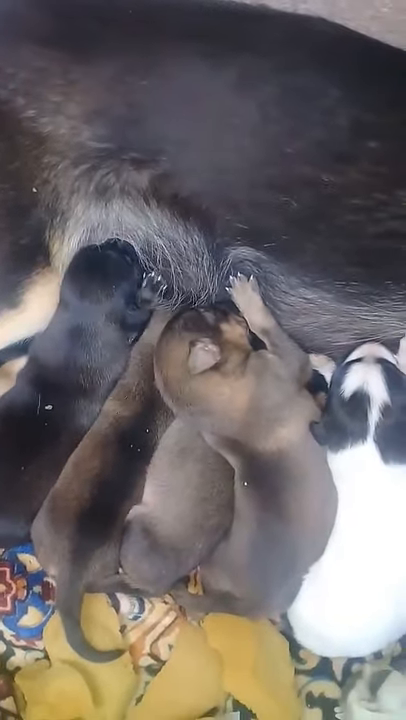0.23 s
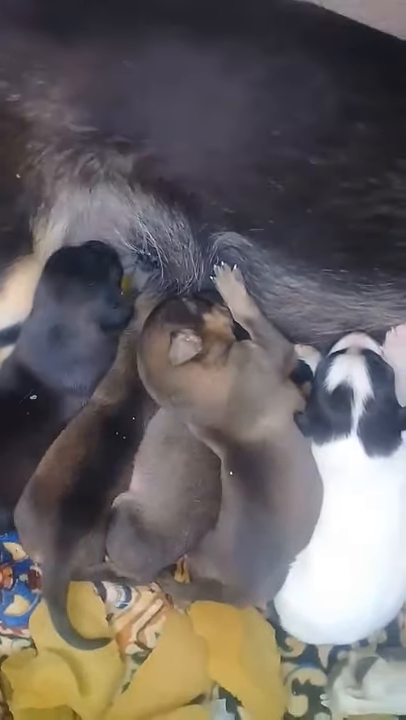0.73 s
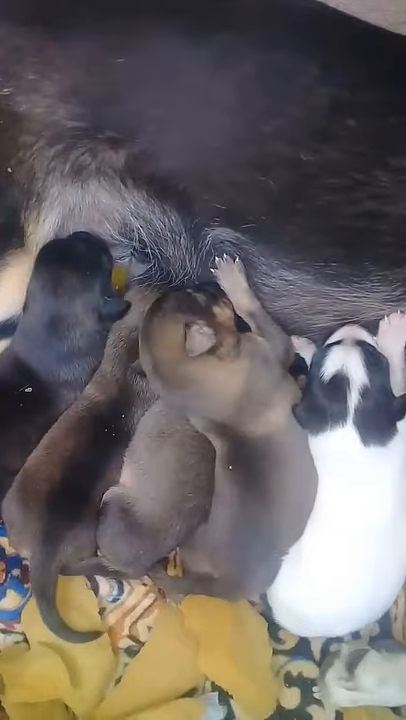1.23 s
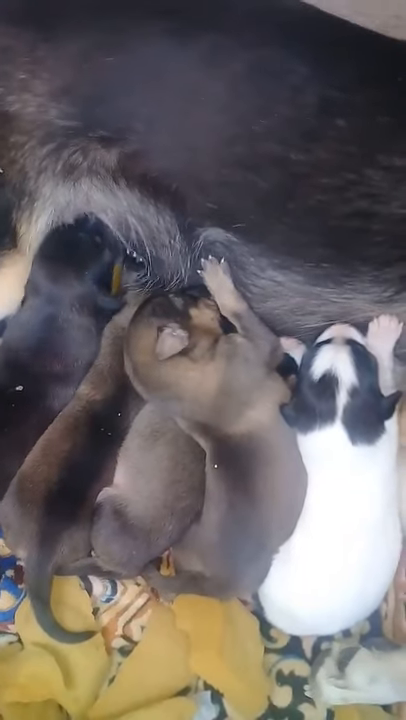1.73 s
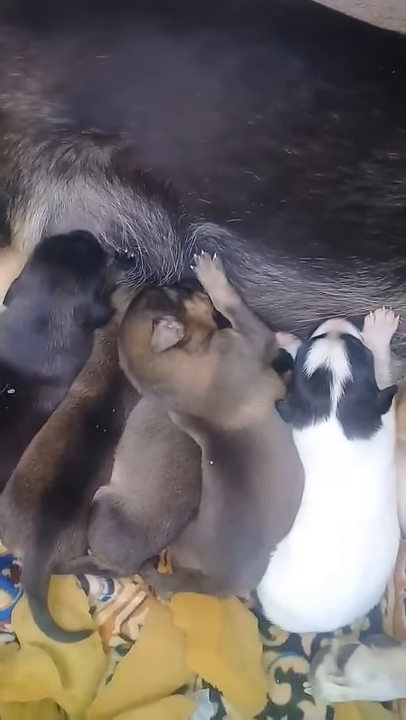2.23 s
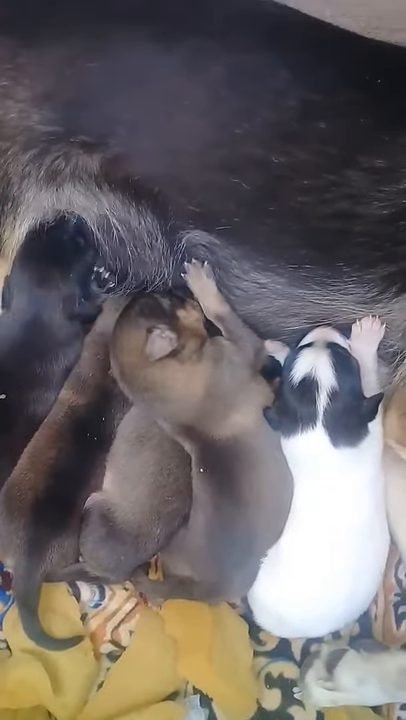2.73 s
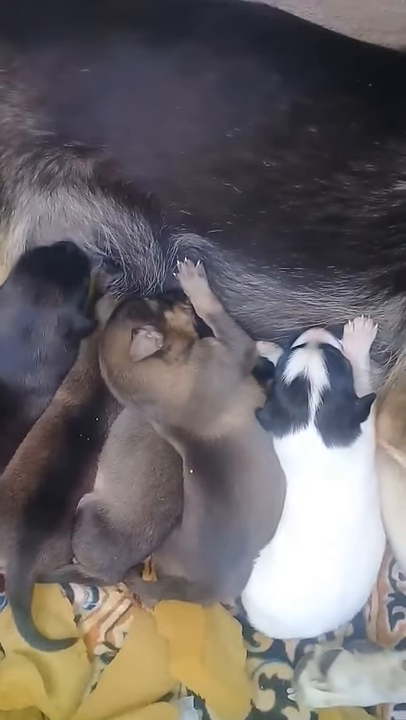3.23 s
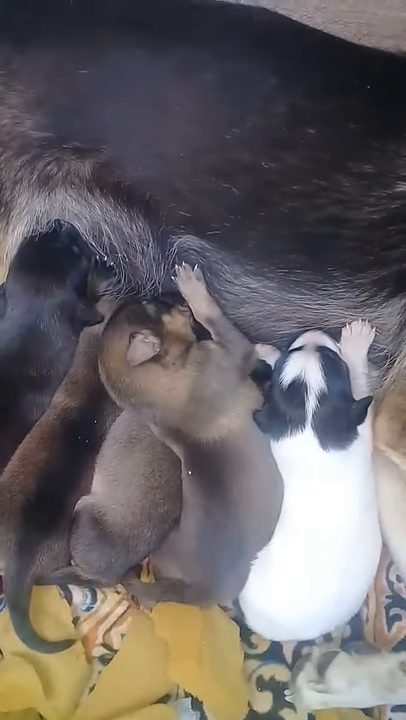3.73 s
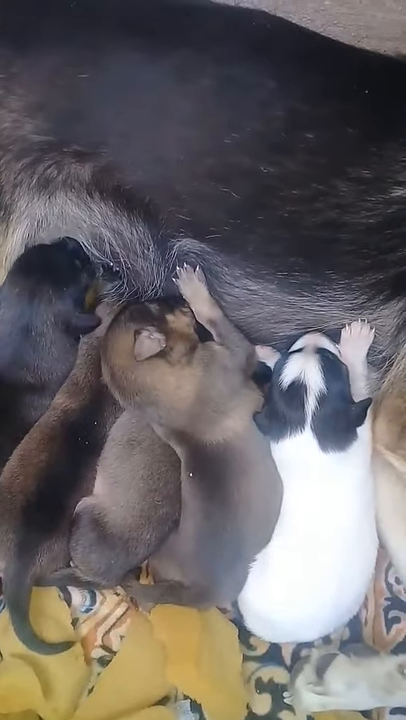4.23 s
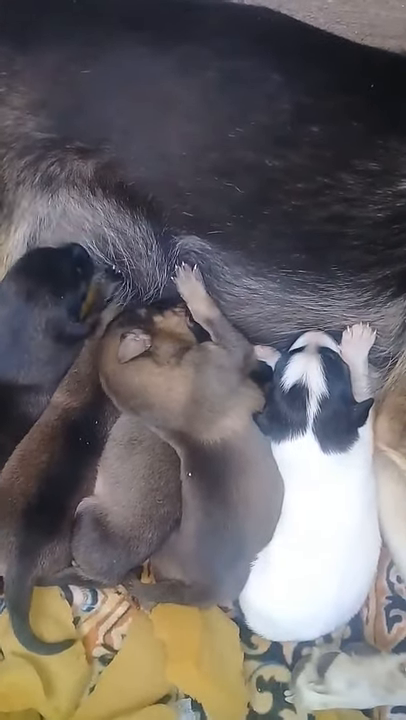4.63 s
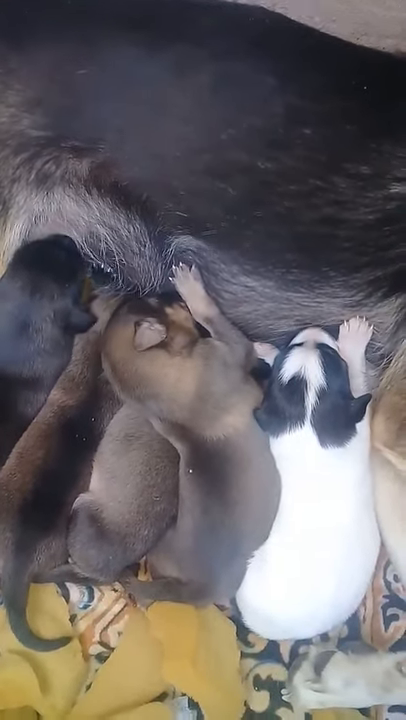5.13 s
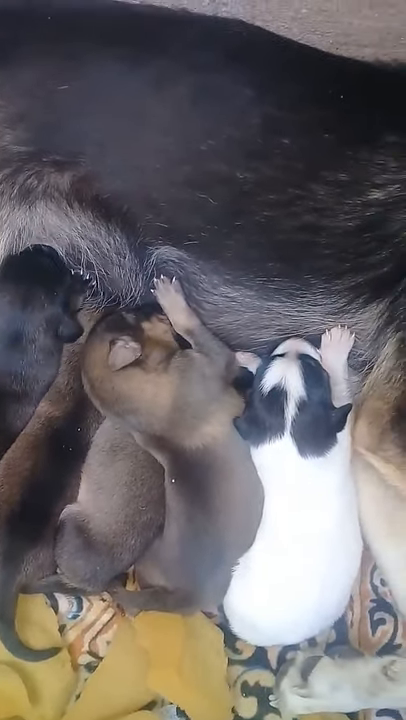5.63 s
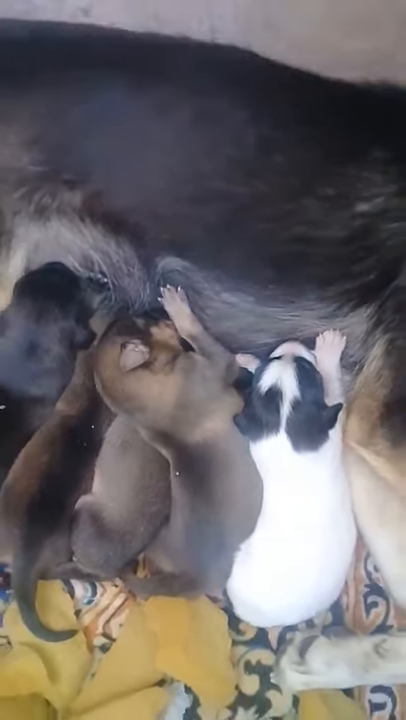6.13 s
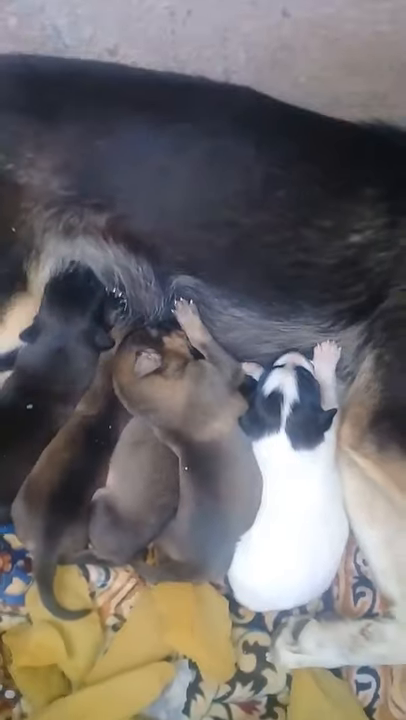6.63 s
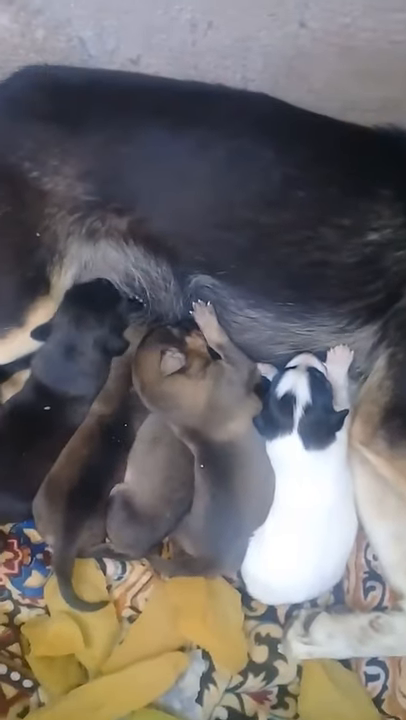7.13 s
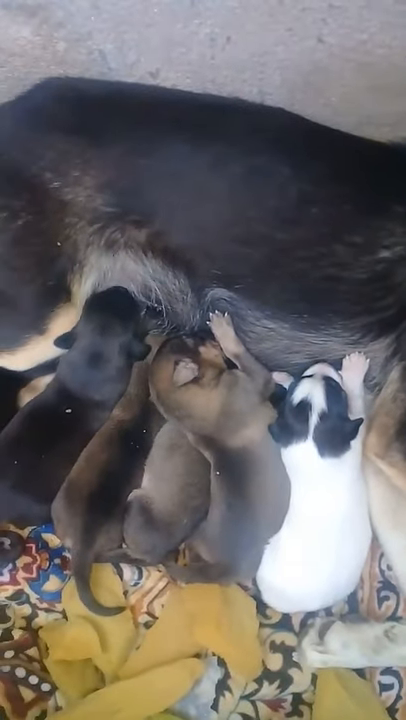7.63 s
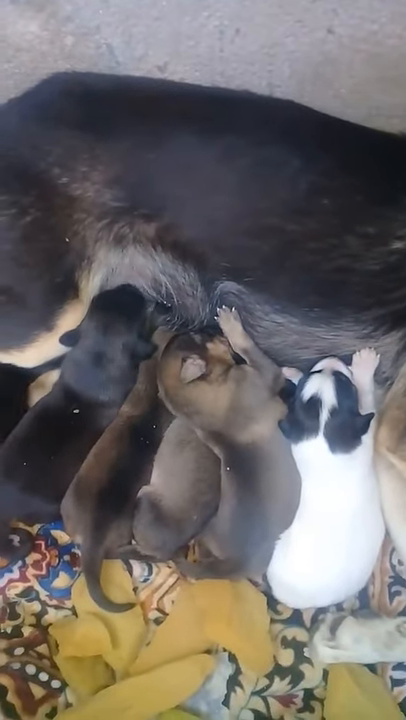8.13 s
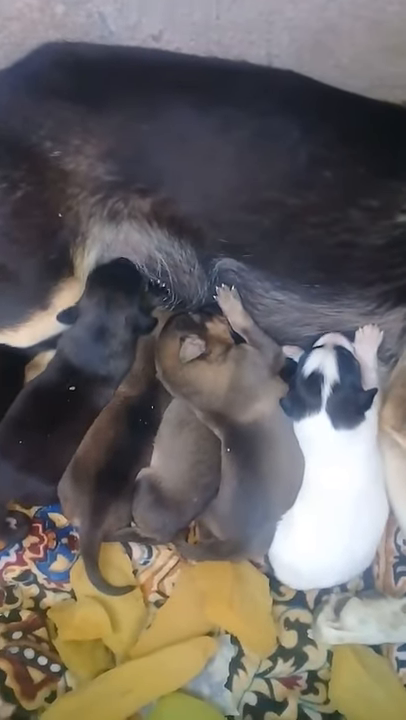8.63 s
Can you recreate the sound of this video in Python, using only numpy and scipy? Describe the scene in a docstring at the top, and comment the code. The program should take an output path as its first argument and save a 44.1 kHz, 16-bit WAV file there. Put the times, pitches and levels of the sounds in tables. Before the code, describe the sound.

Close microphone in a quiet room: tiny puppies whine almost without pause, clear and nasal, their pitch gliding and wobbling, voices sometimes breaking rough. Between and after the whines come hoarse short grunts, little wheezes and a lip smack. Far engines hum low and traffic murmurs faintly underneath, with slight steady hiss. A dull quiet thump sounds near the close, while a last whimper fades into a grunt.

```python
"""Newborn puppies nurse on a blanket in a room. From the start far engines hum, as sines on their low orders,
and traffic rumble and the room's hiss, both coloured noise, lie under it all. At once a puppy whimpers:
gliding stacks of partials that now and then break. Snuffles, wheezes and faint whimper-like tones follow, as
noise in narrow resonances; another puppy grunts hoarsely, as uneven pulses ringing a throat; later lips smack,
as clicks into a small mouth. Near the end comes a low thump, made of sines like the hums.
A few short wall echoes follow the litter."""
import sys
import numpy as np
from scipy import signal
from scipy.fft import rfft, irfft, next_fast_len
from scipy.io import wavfile
from scipy.ndimage import uniform_filter1d

SR = 44100
rng = np.random.default_rng(int(sys.argv[2]) if len(sys.argv) > 2 else 0)


def ratio_of_db(decibels):
    """Turn decibels (scalar or array-like) into linear amplitude factors; 0 dB maps to 1."""
    return 10 ** (np.asarray(decibels, float) / 20)


def bounce(signal):
    """Save signal as a 16-bit WAV file at the path given by the first command-line argument."""
    frames = np.transpose(np.atleast_2d(signal))
    limited = np.clip(frames, -1, 1)
    pcm = np.round(limited * 32767).astype(np.int16)
    wavfile.write(sys.argv[1], SR, pcm)


N = 391597   # length in samples
TIME = np.arange(N) / SR   # seconds


def rms_one(x):
    """Scale to rms 1."""
    return x / np.sqrt(np.mean(x ** 2) + 1e-20)


def in_time(rows):
    """The sample span of a table and its columns over that span."""
    s, *columns = np.transpose(rows)
    span = slice(int(s[0] * SR), min(int(s[-1] * SR), N))
    return span, [np.interp(TIME[span], s, column) for column in columns]


def at_hz(points, hz):
    """Read a spectrum on a log-frequency axis."""
    point_hz, db = np.transpose(points)
    return np.interp(np.log(hz), np.log(point_hz), db)


def coloured(spectrum):
    """Steady noise of a given spectrum, silent outside it; rms 1."""
    size = next_fast_len(N)
    hz = np.arange(1, size // 2 + 2) * SR / size
    inside = (hz > spectrum[0][0]) & (hz < spectrum[-1][0])
    white = rfft(rng.standard_normal(size))
    return rms_one(irfft(white * ratio_of_db(at_hz(spectrum, hz)) * inside, size)[:N])


def drift(hz):
    """Random wandering, mostly slower than hz; rms 1."""
    lowpass = signal.butter(2, hz, fs=SR, output="sos")
    return rms_one(signal.sosfilt(lowpass, rng.standard_normal(N + SR))[SR:])


def resonance(x, hz, width_hz):
    """Two-pole band, gain 1 on top."""
    r = np.exp(-np.pi * width_hz / SR)
    zeros = np.array([1, 0, -1]) * (1 - r * r) / 2
    poles = [1, -2 * r * np.cos(2 * np.pi * hz / SR), r * r]
    return signal.lfilter(zeros, poles, x + 1e-18)


def window(start, end, edge):
    """Up to 1 between start and end, with ramps of edge seconds."""
    return np.clip(np.minimum(TIME - start, end - TIME) / edge, 0, 1)


def glide(s, hz, time):
    """A smooth curve through pitch points, flat at every turn."""
    steps = np.diff(hz) / np.diff(s)
    same = steps[1:] * steps[:-1]   # positive where the pitch keeps its direction
    inner = np.where(same > 0, 2 * same / (steps[1:] + steps[:-1] + 1e-9), 0)
    slope = np.r_[steps[0], inner, steps[-1]]
    k = np.clip(np.searchsorted(s, time) - 1, 0, len(s) - 2)
    width = s[k + 1] - s[k]
    u = (time - s[k]) / width
    ease = u * u * (3 - 2 * u)
    bend = width * u * (1 - u) * ((1 - u) * slope[k] - u * slope[k + 1])
    return hz[k] + ease * (hz[k + 1] - hz[k]) + bend


def edges_db(start, end, rise_s, fall_s, depth_db):
    """0 dB in the middle, sloping to depth_db at both ends."""
    return depth_db * (np.clip(1 - (TIME - start) / rise_s, 0, 1) + np.clip(1 - (end - TIME) / fall_s, 0, 1))


# Far hums, one table each; the last is a low thump. Each row: time in seconds, pitch in Hz, level in dB.
HUMS = [
    [(0, 52.8, -60.5), (.5, 54.3, -60), (2.0, 54.4, -62.5), (2.9, 53.9, -62), (3.4, 50.2, -59),
     (3.98, 48.5, -60), (4.4, 43.2, -74)],
    [(4.41, 40.6, -67), (4.65, 37.08, -61), (5.2, 33.32, -55.5), (6.09, 36.74, -57), (6.7, 36.8, -57.5),
     (7.41, 36.7, -57.5), (7.8, 42.84, -76.5), (8.88, 41.2, -87)],
    [(7.85, 44.56, -90), (8.12, 43.71, -47.5), (8.6, 44.2, -70.5)],
]
# Their orders. Each row, one a hum or thump: first, second and third order in dB against its level.
HUM_ORDERS = [(0, -4.5, -30.5), (-12, -0.5, -13.5), (2, -21, -40)]


def hums_and_thump(waver):
    """The low orders of far engines and of a low thump, wavering on their way through the walls."""
    out, slow = np.zeros(N), drift(2.27)
    for rows, orders_db in zip(HUMS, HUM_ORDERS):
        span, (hz, level_db) = in_time(rows)
        phase = 2 * np.pi * np.cumsum(hz) / SR
        for k, db in enumerate(orders_db):
            wavering = 1 + waver * np.roll(slow, k * SR)[span]
            out[span] += np.sqrt(2) * ratio_of_db(level_db + db) * wavering * np.sin((k + 1) * phase)
    return out


# Course of the traffic rumble. Each row: time in seconds, level in dB.
RUMBLE_LEVEL = [(0, -60), (.7, -61.5), (2, -61.5), (3.4, -63.5), (4.4, -61), (4.9, -61), (5.3, -60.5),
                (7.3, -59.5), (8.1, -61), (8.88, -61.5)]
# Colour of the rumble. Each row: frequency in Hz, density in dB per Hz.
RUMBLE_COLOUR = [(20, -14), (37, -12), (60, 0), (100, -7.5), (150, -21.5), (300, -27.5)]


def traffic_rumble():
    """Low coloured noise whose level follows its course and sways at random."""
    level_db = np.interp(TIME, *np.transpose(RUMBLE_LEVEL))
    sway_db = 2.73 * drift(3.0)
    return ratio_of_db(level_db + sway_db) * coloured(RUMBLE_COLOUR)


# Colour of the room and microphone hiss. Each row: frequency in Hz, density in dB per Hz.
HISS_COLOUR = [(76, -32.5), (130, 2.5), (210, -20.5), (278, -5.5), (645, -10.5), (1060, -13.5),
               (2140, -16.5), (4770, -25), (12000, -25), (15600, -23)]


def room_hiss():
    """Steady coloured noise of room and microphone."""
    return ratio_of_db(-73) * coloured(HISS_COLOUR)


# Whimpers, one table each. Each row: time in seconds, pitch in Hz, effort in dB,
# second partial in dB against the effort.
WHIMPERS = [
    [(0.012, 1418, -43.5, -6), (0.08, 1355, -41, -5.5), (0.09, 1230, -41, -15.5), (0.142, 1124, -41, -4),
     (0.184, 1116, -41.5, -4.5), (0.282, 985, -40.5, -10.5), (0.47, 893.7, -40.5, -12),
     (0.534, 888, -38.5, -13), (0.56, 806, -40.5, -6.5), (0.598, 790, -43, -4), (0.65, 1015, -41.5, -13),
     (0.682, 966, -41, -21), (0.712, 1073, -44, -14.5), (0.728, 951, -36, 1)],
    [(1.25, 856, -42, -8), (1.266, 851, -46, -3), (1.346, 690, -37.5, -10.5), (1.39, 651, -35.5, -9),
     (1.4, 720, -28.5, -8), (1.41, 780, -40, -4)],
    [(1.68, 733, -50, -8), (1.688, 803, -42, -8), (1.694, 811, -44.5, -6), (1.722, 657, -40.5, -21),
     (1.756, 619, -44.5, -8.5), (1.83, 632, -30.5, -5)],
    [(2.0, 785, -56, -8), (2.082, 767, -54.5, -7)],
    [(2.09, 1212, -52, -2), (2.122, 1200, -48, -1.5), (2.134, 955, -44, -19), (2.2, 910, -39.5, -21),
     (2.25, 820, -42, -3.5), (2.32, 803, -39.5, -4), (2.395, 910, -36, -7)],
    [(2.48, 541, -50, -8), (2.552, 512, -54, -26)],
    [(2.686, 1210, -41, -14), (2.698, 1065, -41.5, -5.5), (2.75, 1090, -36.5, -8.5),
     (2.842, 1018, -41.5, -9), (2.866, 995, -38.5, -13.5), (2.918, 996, -40.5, -13),
     (2.932, 1083, -44, -20), (2.95, 1084, -39, -13)],
    [(3.24, 1797, -32.5, -20), (3.3, 1405, -36.5, -13), (3.342, 1365, -41, -4.5),
     (3.402, 1177, -39.5, -21.5), (3.442, 1165, -42, -16.5), (3.494, 1244, -40.5, -23.5),
     (3.556, 1249, -41, -12.5), (3.658, 1103, -37.5, -8), (3.682, 1091, -37, -3),
     (3.724, 1221, -41.5, -16.5), (3.738, 1225, -40.5, -5), (3.774, 1091, -36.5, -8),
     (3.796, 1086, -36.5, -5), (3.868, 1199, -39, -10.5), (3.89, 1273, -42, -8), (3.935, 1190, -37, -17)],
    [(4.186, 1522, -39.5, -12), (4.23, 1637, -34.5, -13), (4.256, 1629, -34.5, -7.5),
     (4.278, 1482, -36, -16), (4.326, 1587, -45.5, -16), (4.338, 1469, -45, -10), (4.345, 1498, -38, -9)],
    [(4.47, 930, -74, -30), (4.526, 897, -65, -30), (4.558, 850, -65, -35), (4.62, 874, -63, -33)],
    [(4.63, 1242, -39, -6), (4.69, 1252, -42.5, -6.5), (4.704, 1310, -36, -9.5), (4.728, 1310, -39.5, -8),
     (4.81, 1123, -38.5, -8.5), (4.828, 1112, -38, -8), (4.844, 1220, -40, -15), (4.86, 1201, -37.5, -2.5),
     (4.89, 1115, -38.5, -12), (4.897, 1144, -27, -8)],
    [(5.113, 1318, -32, -8), (5.121, 1183, -46.5, -8), (5.139, 1102, -37, -8), (5.295, 1031, -40.5, -11.5),
     (5.345, 1023, -39.5, -11), (5.379, 979, -37, -5.5), (5.417, 982, -37.5, -16.5),
     (5.459, 909, -39, -7.5), (5.547, 968, -40, -13.5), (5.581, 1067, -43.5, -9), (5.593, 980, -23, 0)],
    [(6.22, 965, -64.5, -35), (6.345, 965, -76, -35)],
    [(6.355, 1233, -41, -9), (6.373, 1105, -42, -19), (6.455, 1028, -43.5, -6), (6.501, 923, -43, -3),
     (6.539, 935, -40.5, -4.5), (6.571, 989, -44, -1), (6.599, 985, -41, -4), (6.655, 877.5, -44, -8),
     (6.753, 914, -39, -6), (6.791, 887, -43.5, -3), (6.881, 874.5, -40, -6.5), (6.923, 965, -43, 1),
     (7.069, 959, -39, -2), (7.113, 993, -39.5, -3.5), (7.235, 857, -40.5, -5), (7.297, 844, -41, -5),
     (7.311, 920, -45, 2), (7.345, 917, -39.5, -5), (7.359, 1034, -35, -1.5), (7.365, 1010, -41, -10)],
    [(7.783, 1569, -38, -16), (7.805, 1442, -37.5, -18), (7.811, 1333, -36, -16), (7.847, 1033, -41.5, -5),
     (7.869, 991, -39, -4), (8.013, 1035, -44, -0.5), (8.047, 964, -40, 1), (8.095, 965, -42.5, 2),
     (8.165, 855, -41.5, -5), (8.233, 857, -43, -5.5), (8.327, 929, -41.5, -10.5), (8.357, 1083, -46, -10),
     (8.371, 990, -32, -10)],
]
# Colour of each whimper, in the same order. Each row: third partial and nasal treble, both in dB against effort.
WHIMPER_COLOURS = [(5.5, -23), (11.5, -23), (2, -20), (19, -28), (5, -21), (-17, -38), (10, -19.5),
                   (-2, -20.5), (-4, -28.5), (9.5, -36), (-4, -22), (5.5, -22.5), (-23, -35), (1, -19),
                   (2, -20.5)]
# Where the voice breaks. Each row: start and end in seconds, cycles in a strong-weak pattern,
# depth of the pattern (0-1), chaos (0-1).
BREAKS = [(0.559, 0.592, 2, 0.4, 0.3), (0.585, 0.668, 4, 0.45, 0.45), (0.66, 0.701, 2, 0.07, 0.15),
          (1.253, 1.337, 3, 0.42, 0.48), (1.326, 1.4, 2, 0, 0.24), (1.689, 1.732, 2, 0.3, 0.5),
          (1.736, 1.83, 2, 0.05, 0.12), (2.34, 2.392, 2, 0.31, 0.27), (3.239, 3.256, 2, 0.18, 0.51),
          (7.302, 7.334, 3, 0.49, 0.18), (8.212, 8.293, 2, 0.08, 0.11)]
# Brief dips of the first partial. Each row: middle in seconds, depth in dB.
CATCHES = [(0.088, -6), (3.371, -9.5), (4.691, -17), (4.741, -18), (7.806, -21)]
# Throat, nose and the echo off the blanket lift and cancel a partial as it glides, one table for each of
# the first three partials. Each row: frequency of the partial in Hz, gain in dB.
FIRST_GAIN = [(500, -7), (640, -8), (800, 1.5), (850, -1), (900, 4), (965, -2), (1010, 1.5), (1050, 2.5),
              (1090, 0), (1150, 0.5), (1225, 2.5), (1300, -4), (1350, 5.5), (1400, -1.5), (1485, 3.5),
              (1620, -5)]
SECOND_GAIN = [(1200, -0.5), (1350, 5.5), (1620, -3), (1750, -2.5), (1950, -4), (2050, -2), (2170, 2),
               (2260, -3.5), (2330, -7), (2450, 4.5), (2620, -4), (2800, -14), (3300, -9)]
THIRD_GAIN = [(1900, -36), (2450, -23), (2640, -25), (2900, -46), (3060, -42.5), (3200, -31), (3450, -37.5),
              (3700, -32.5), (4000, -40), (4900, -49)]
# Throat and nose above the third partial. Each row: frequency in Hz, gain in dB.
TRACT = [(2400, 13), (2900, 2), (3400, -0.5), (3900, -16), (4400, -23), (5800, -33), (6600, -12),
         (7500, -4), (9300, -11.5), (10500, -8.5), (12100, -15.5), (13800, -19.5), (15500, -34.5)]
# Breath noise in the nose. Each row: frequency in Hz, density in dB per Hz.
BREATH_COLOUR = [(300, -9), (1000, -1), (2500, -2.5), (5500, -20), (7500, 1), (9000, -1.5), (10200, 2),
                 (11000, -12), (11800, 7.5), (14000, -35), (15500, -3)]


def whimpers(jitter, shimmer, swell_db, overtone_db, breath_db):
    """A stack of partials on the vocal-fold pitch; breaks add lines at fractions of the pitch and chaos."""
    catch_s = 0.01                 # half the length of a dip
    rasp_s, rasp = 0.018, 0.35     # every whimper ends in a short rasp (chaos 0-1)
    halves = sum(window(a, b, 0.0037) * depth for a, b, cycles, depth, chaos in BREAKS)
    rough = sum(window(a, b, 0.00684) * chaos for a, b, cycles, depth, chaos in BREAKS)
    hz, fade = np.full(N, 1e3), np.zeros(N)
    first_db, second_db, third_db, treble_db = np.zeros((4, N))
    for rows, (third_colour_db, treble_colour_db) in zip(WHIMPERS, WHIMPER_COLOURS):
        span, (_, effort_db, rich_db) = in_time(rows)
        s, pitch_hz = np.transpose(rows)[:2]
        start, end = s[0], s[-1]
        hz[span] = uniform_filter1d(glide(s, pitch_hz, TIME[span]), 300, mode="nearest")
        # the voice sets in and dies away; its overtones come later and leave earlier
        first_db[span] = effort_db + edges_db(start, end, 0.011, 0.017, -15.5)[span]
        bloom_db = first_db[span] + edges_db(start, end, 0.087, 0.053, -9)[span]
        second_db[span] = bloom_db + rich_db
        third_db[span] = bloom_db + third_colour_db
        treble_db[span] = bloom_db + treble_colour_db
        fade[span] = np.minimum(window(start, 99, 0.002), window(-1, end, 0.008))[span]
        rough = rough + rasp * window(end - rasp_s, end, 0.00715)
    first_db += sum(db * window(s - catch_s, s + catch_s, catch_s) for s, db in CATCHES)

    wobble, flutter, tremor, swell = [drift(rate_hz) for rate_hz in (195.7, 305.0, 102.0, 13.9)]
    unsteady_hz = hz * (1 + (jitter + 0.0672 * rough) * wobble)
    phase = 2 * np.pi * np.cumsum(unsteady_hz) / SR
    voice = ratio_of_db(first_db + at_hz(FIRST_GAIN, hz)) * np.sin(phase)
    on = fade > 0
    overtones = {2: (second_db, SECOND_GAIN), 3: (third_db, THIRD_GAIN)}
    for k, start_phase in enumerate(rng.uniform(0, 2 * np.pi, 22), 2):
        base_db, gain = overtones.get(k, (treble_db + overtone_db, TRACT))
        partial_hz = k * hz[on]
        own_db = swell_db * np.roll(swell, k * SR // 3)[on]   # each overtone swells by itself
        level = ratio_of_db(base_db[on] + at_hz(gain, partial_hz) + own_db)
        voice[on] += level * np.sin(k * phase[on] + start_phase) * (partial_hz < TRACT[-1][0])
    # make room for the power that the breaks add
    voice *= np.sqrt(2) * fade / np.sqrt(1 + 2 * halves ** 2 + rough ** 2)

    # cycles differ in strength by a pattern, and chaos shakes the level
    pattern = sum(window(a, b, 0.0071) * depth * np.cos(phase / cycles) for a, b, cycles, depth, chaos in BREAKS)
    broken = voice * (2 * pattern + rough * flutter)
    small_mouth = signal.butter(4, 640, "high", fs=SR, output="sos")   # it radiates little bass
    broken = signal.sosfilt(small_mouth, broken + 1e-18)
    breath = ratio_of_db(treble_db + breath_db) * coloured(BREATH_COLOUR) * fade
    return voice * (1 + shimmer * tremor) + broken + breath


# Snuffles, wheezes and faint whimper-like tones. Each row: start and end in seconds,
# centre and width in Hz, level in dB.
SNUFFLES_AND_TONES = [(0.894, 1.167, 2104, 80, -78), (0.951, 1.025, 4240, 500, -72.5),
                      (1.004, 1.07, 3570, 700, -77), (1.374, 1.478, 2430, 101, -68),
                      (2.426, 2.581, 2750, 152.6, -76), (4.057, 4.248, 3920, 900, -71),
                      (4.173, 4.265, 900, 39.4, -70), (4.598, 4.655, 895, 29.9, -58.5),
                      (6.128, 6.272, 3040, 900, -99), (6.377, 6.436, 1616, 31, -47),
                      (7.575, 7.74, 2430, 146, -72), (7.593, 7.637, 1090, 198.5, -69.5),
                      (8.347, 8.538, 1975, 93.6, -64.5), (8.484, 8.57, 1717, 60, -72),
                      (8.69, 8.835, 2300, 39.7, -82)]


def snuffles_and_faint_tones():
    """Snuffles, wheezes and faint whimper-like tones: noise in one resonance, passed twice."""
    noise = rng.standard_normal(N)
    out = np.zeros(N)
    for start, end, hz, width_hz, db in SNUFFLES_AND_TONES:
        band = rms_one(resonance(resonance(noise, hz, width_hz), hz, width_hz))
        out += ratio_of_db(db) * window(start, end, (end - start) / 3) * band
    return out


# Grunts. Each row: start, loudest moment and end in seconds, peak level in dB,
# first and last pulses per second, irregularity (0-1), mouth opening in dB.
GRUNTS = [ (1.566, 1.651, 1.738, -46.5, 296.3, 337.5, 0.46, -4.5),
          (1.776, 1.824, 2.03, -40.5, 338.9, 249.1, .3, -0.5),
          (2.398, 2.407, 2.48, -56, 396, 251.4, 0.49, -1.5), (3.653, 3.705, 3.77, -44, 306.5, 380, .15, -2),
          (3.756, 3.771, 3.795, -49, 296, 340, 0.084, -4),
          (3.875, 3.94, 4.002, -44.5, 334, 333.7, 0.39, -1.5),
          (4.011, 4.009, 4.027, -40.5, 330, 337, 0.069, -7),
          (4.031, 4.072, 4.152, -44, 307.6, 271.6, 0.19, -5), (5.425, 5.462, 5.54, -42, 342.6, 305, .08, 3),
          (6.874, 6.917, 7.046, -43.5, 372.6, 291.5, 0.12, 2.5),
          (7.023, 7.105, 7.22, -40.5, 324.7, 399.8, 0.066, 2),
          (8.615, 8.85, 9.1, -43, 333.2, 336, 0.29, -3)]
# Resonances of the grunting throat. Each row: frequency in Hz, width in Hz, level in dB.
GRUNT_THROAT = [(366.6, 116, -10.5), (484, 62, -4.5), (715, 200, 4.5), (1049, 342, -0.5), (2153, 270, -10),
                (2540, 1530, -19.5), (7500, 3600, -29.5), (11960, 2850, -11)]


def grunts(hiss_share):
    """Uneven glottal pulses, with more air the rougher they come, ring the throat."""
    rise_db, fall_db, edge_s = 10, 7, 0.014   # swell before the loudest moment, sag after it, soft edges
    pulses, level, air, opening = np.zeros((4, N))
    wobble, sizes = drift(120), drift(200)
    for start, loudest, end, peak_db, first_per_s, last_per_s, uneven, open_db in GRUNTS:
        span = slice(int(start * SR), min(int(end * SR), N))
        per_s = np.interp(TIME[span], [start, end], [first_per_s, last_per_s])
        swell_db = np.interp(TIME[span], [start, loudest, end], [-rise_db, 0, -fall_db])
        level[span] += ratio_of_db(peak_db + swell_db) * window(start, end, edge_s)[span]
        air[span] = uneven
        cycles = np.cumsum(per_s * np.exp(uneven * wobble[span])) / SR
        beats = np.diff(np.floor(cycles), prepend=0)   # one click a cycle
        pulses[span] = rms_one(beats * ratio_of_db((1.5 + 6.5 * uneven) * sizes[span]))
        opening[span] = ratio_of_db(open_db)
    puffs = signal.lfilter([1], [1, -0.992], pulses) * rng.standard_normal(N)
    hiss = rms_one(puffs) * pulses.std()
    rings = np.zeros(N)
    for k, (hz, width_hz, db) in enumerate(GRUNT_THROAT):
        source = hiss if hz > 5000 else pulses + hiss_share * air * hiss   # only air reaches the nose
        gain = (-1) ** k * ratio_of_db(db) * (opening if hz > 1800 else 1) / np.sqrt(width_hz)
        rings += gain * resonance(resonance(source, hz, width_hz), hz, width_hz)
    even_rings = rings / np.sqrt(uniform_filter1d(rings ** 2, 2500) + 1e-9)
    flutter_db = 1 * drift(24.8)   # the breath behind a grunt is unsteady
    return level * ratio_of_db(flutter_db) * even_rings


# Lips on the teat. Each row: time in seconds, strength of the click in dB.
SMACKS = [(2.405, -70), (2.458, -72), (2.949, -76), (4.015, -82), (6.789, -48.5)]
# Modes of the small mouth. Each row: frequency in Hz, relative level in dB, approximate ring time in seconds.
SMACK_MODES = [(500, 12.5, 0.023), (900, 24, 0.023), (1444, 10, 0.099), (2780, 10.5, 0.023),
               (4800, 0, 0.013)]


def smacks():
    """Each parting of the lips clicks into the small mouth."""
    clicks = np.zeros(N)
    for s, db in SMACKS:
        clicks[round(s * SR)] = ratio_of_db(db)
    soft_contact = signal.butter(2, 3500, fs=SR, output="sos")   # soft and wet
    clicks = signal.sosfilt(soft_contact, clicks + 1e-18)
    # the ring time in the gain makes up for the weaker response of a narrow mode to a click
    return sum(ratio_of_db(db - 9.5) * resonance(clicks, hz, 2.0 / ring_s) * ring_s * SR / 7
               for hz, db, ring_s in SMACK_MODES)


# Echoes off the walls. Each row: delay in seconds, level in dB.
ECHOES = [(.0031, -23.5), (.0077, -27), (.0134, -23.5), (.021, -24), (.029, -25.5)]


def walls(x):
    """A few short echoes of alternating sign, duller than the direct sound."""
    dull = signal.lfilter([0.5], [1, -0.5], x)
    return sum((-1) ** k * ratio_of_db(db) * np.pad(dull, (round(s * SR), 0))[:N] for k, (s, db) in enumerate(ECHOES))


def scene():
    """The litter close by, heard nearly alike in both channels."""
    background = hums_and_thump(waver=0.36) + traffic_rumble() + room_hiss()
    voices = whimpers(jitter=0.0015, shimmer=0.072, swell_db=4.0, overtone_db=-4.6, breath_db=-6.5)
    litter = voices + snuffles_and_faint_tones() + grunts(hiss_share=0.41) + smacks()
    mid = litter + walls(litter) + background
    side = ratio_of_db(-85.5) * rng.standard_normal(N)   # faint hiss, opposite in the two channels
    return np.array([mid + side, mid - side])


def band_limit(x):
    """A steep low-pass at the top of the band."""
    return signal.sosfilt(signal.butter(12, 15700, fs=SR, output="sos"), x)


def record(dry):
    """The finished stereo mix, as it is stored."""
    return band_limit(dry)


dry = scene()
out = record(dry)
bounce(out)
```